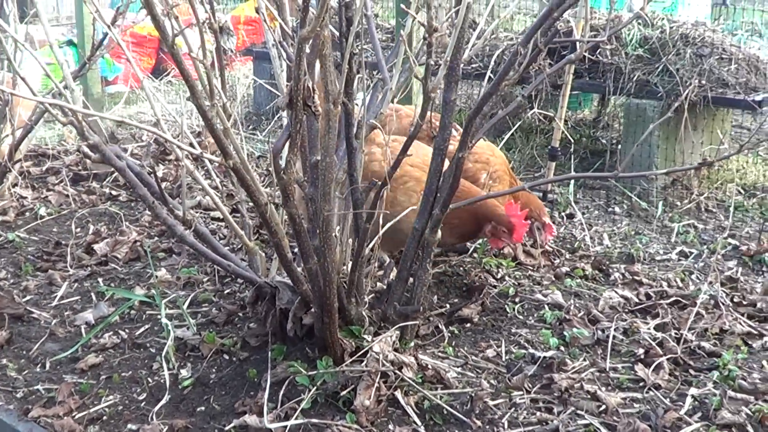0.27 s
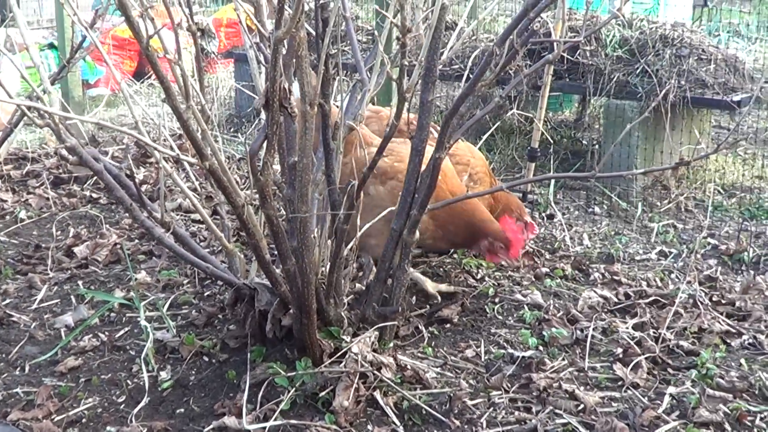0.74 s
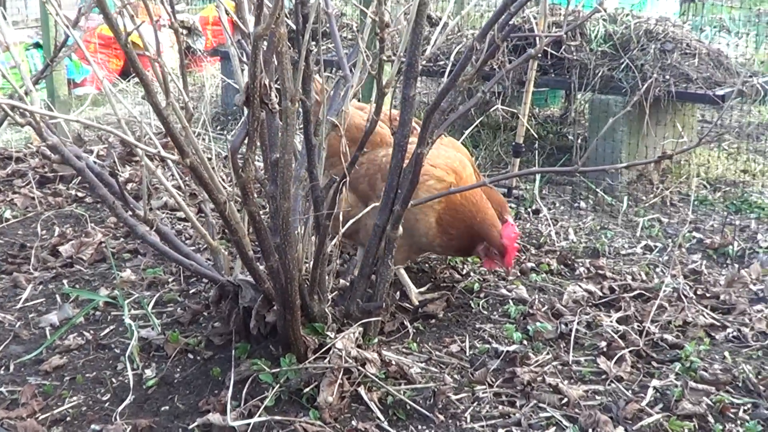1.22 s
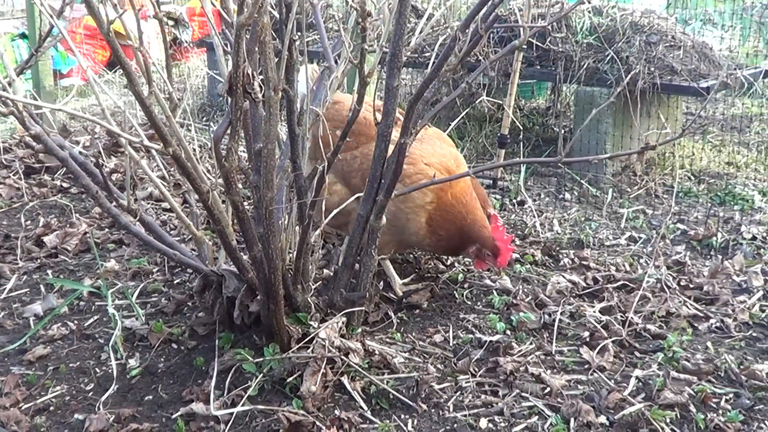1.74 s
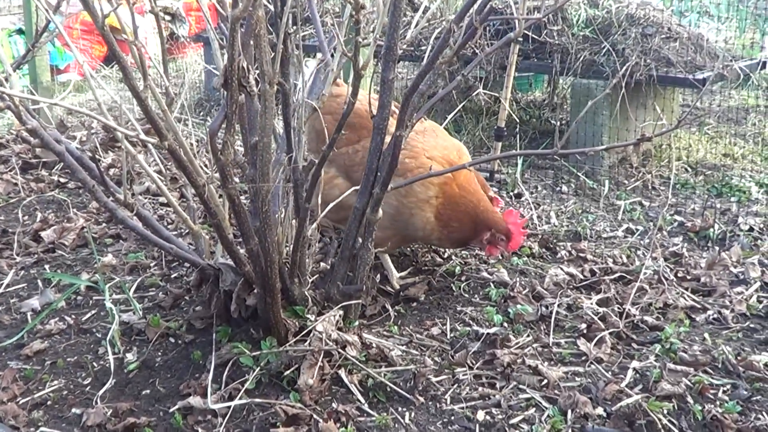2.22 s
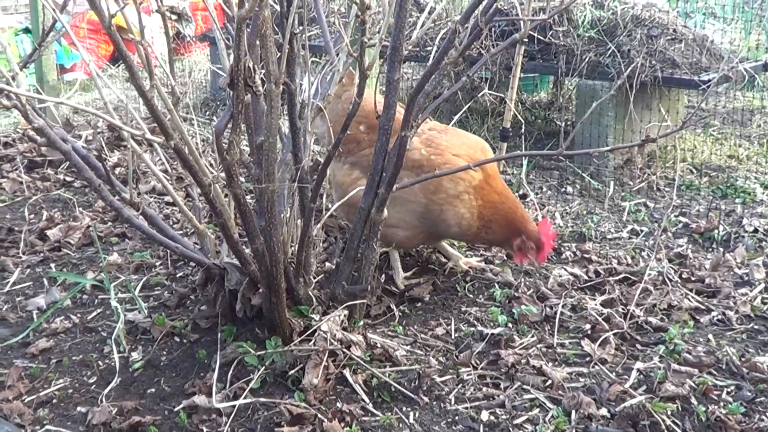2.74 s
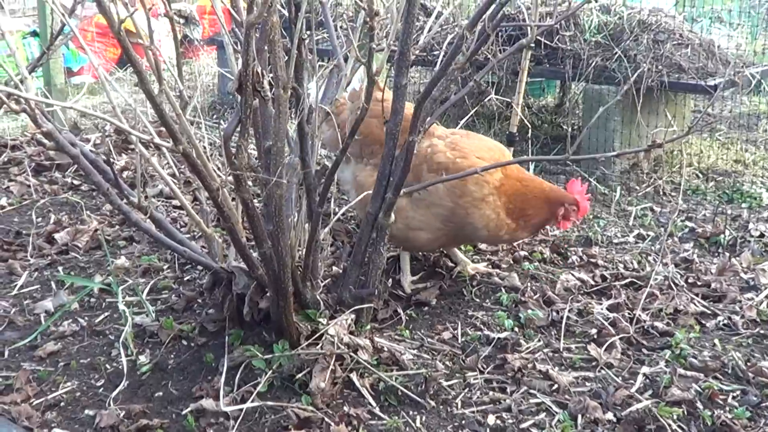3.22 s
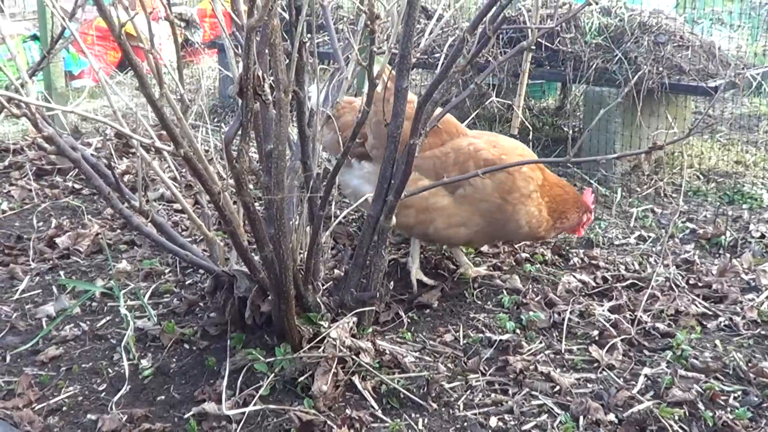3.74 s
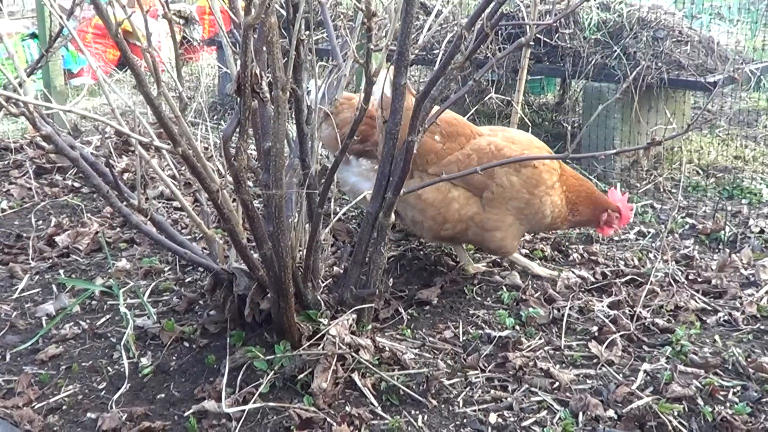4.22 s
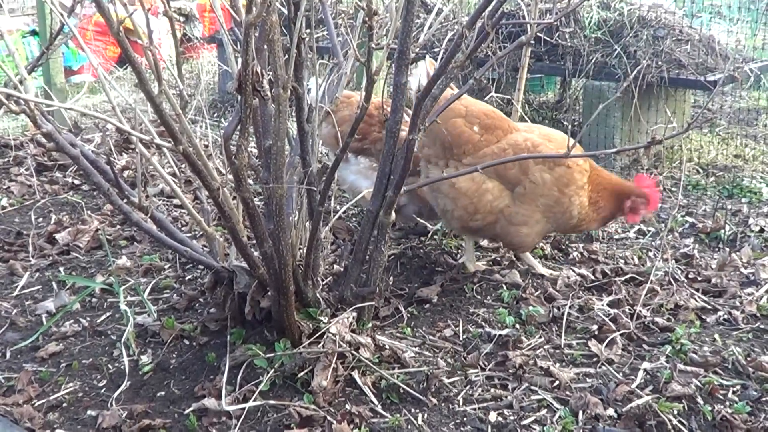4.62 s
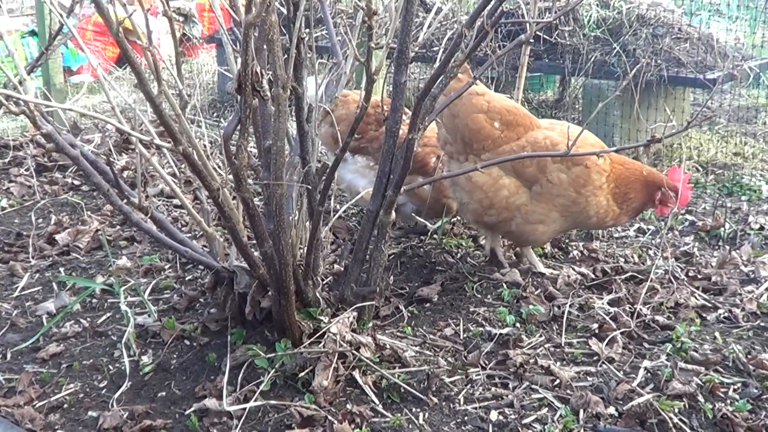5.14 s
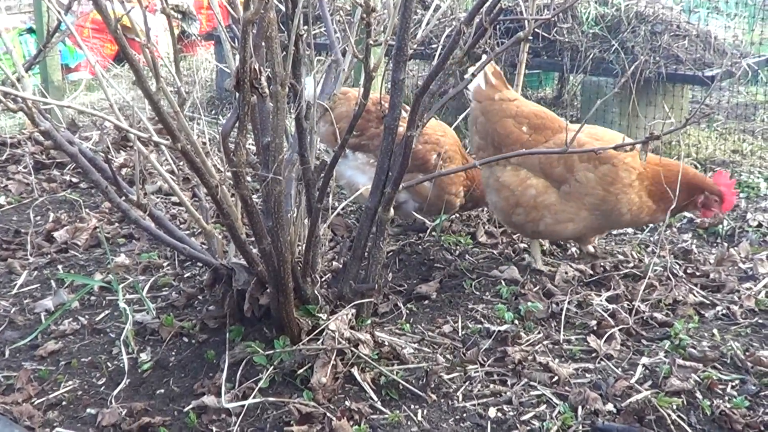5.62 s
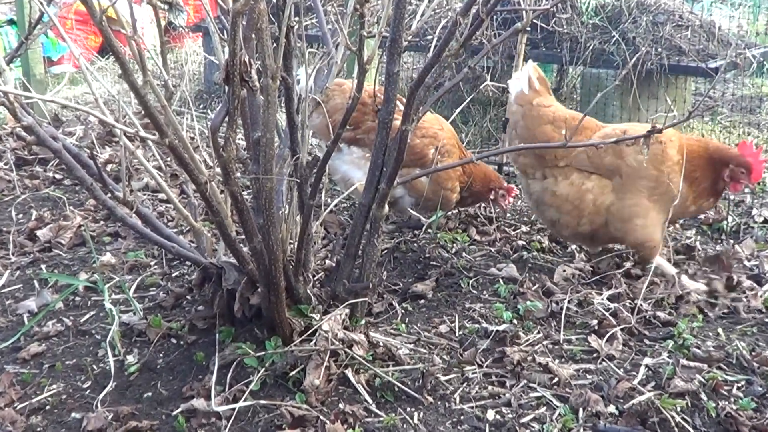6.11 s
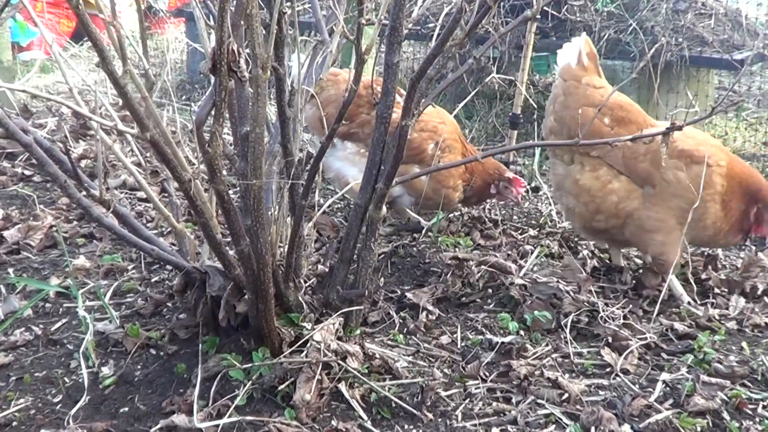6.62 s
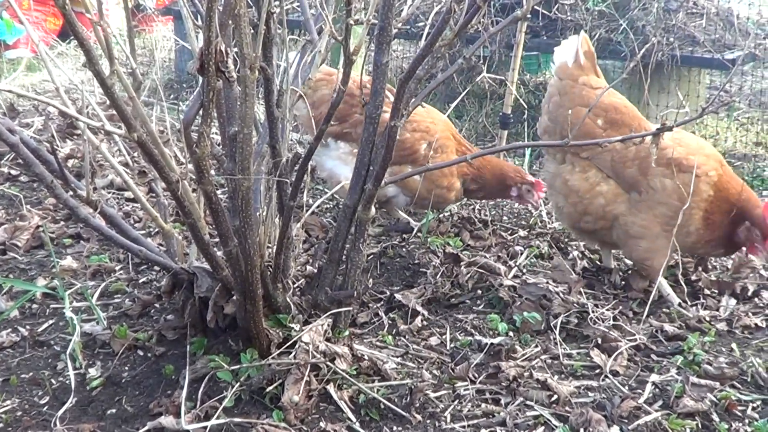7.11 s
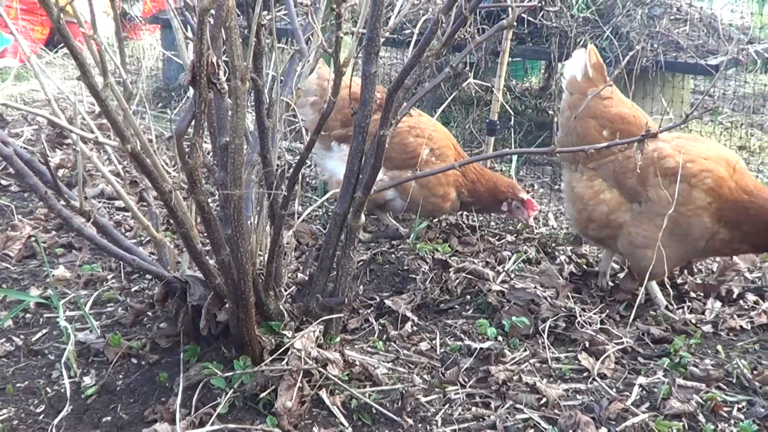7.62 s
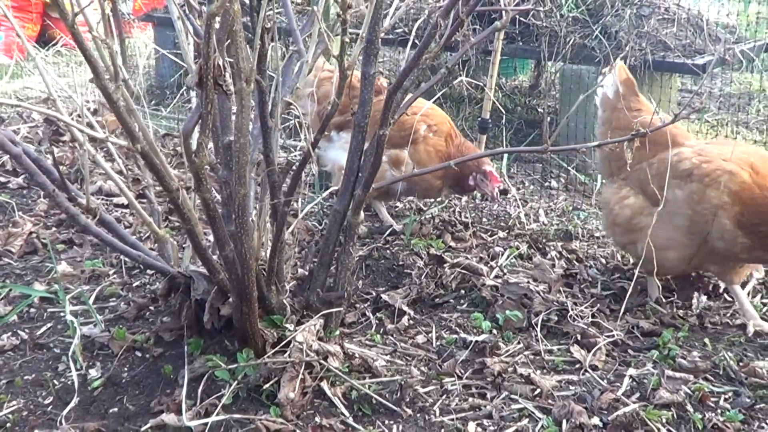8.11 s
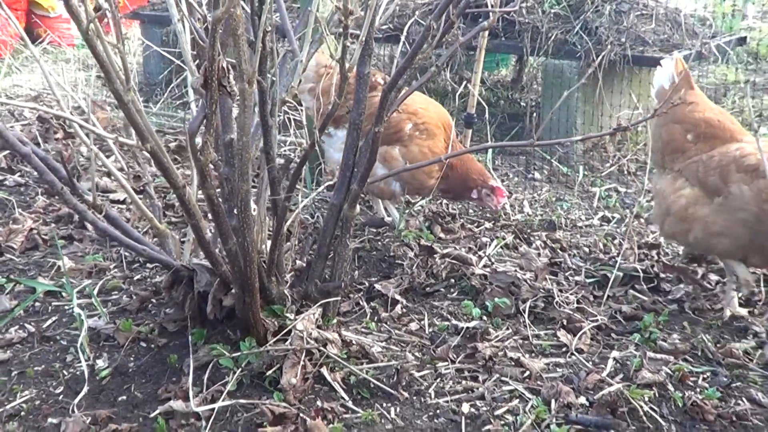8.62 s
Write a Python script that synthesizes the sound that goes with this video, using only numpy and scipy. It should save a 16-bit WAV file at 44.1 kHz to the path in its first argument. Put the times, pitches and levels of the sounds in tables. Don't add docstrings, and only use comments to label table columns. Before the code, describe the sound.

Outdoors in a garden, hens forage in dry leaves a few metres from a small stereo camera microphone. Light crackles and scattered leaf snaps come first, with a distant finch wheezing and twittering and a near bird chirping. Around six seconds the scratching becomes vigorous and loud, then drops away. Finally rustling returns beneath a lively whistled song. Soft traffic hum, hiss and a thin high whine continue throughout.

```python
import sys
import numpy as np
from scipy import signal
from scipy.fft import rfft, irfft, next_fast_len
from scipy.io import wavfile
from scipy.ndimage import uniform_filter1d

SR = 44100
rng = np.random.default_rng(int(sys.argv[2]) if len(sys.argv) > 2 else 0)


def amplitude_ratio(level_db):
    exponent = np.asarray(level_db, float) / 20
    return 10 ** exponent


def master_out(mix):
    frames = np.transpose(np.atleast_2d(mix))
    ceiling = np.clip(frames, -1, 1)
    pcm = np.round(ceiling * 32767).astype(np.int16)
    wavfile.write(sys.argv[1], SR, pcm)


N = 390718
T = np.arange(N) / SR
LEFT_RIGHT = np.array([[1], [-1]])


def level(x, db):
    return x * amplitude_ratio(db) / np.sqrt(np.mean(x ** 2))


def colour(x, *tables):
    size = next_fast_len(N)
    octave = np.log(np.arange(size // 2 + 1) * SR / size + 1)
    db = 0
    for table in tables:
        hz, table_db = np.array(table).T
        db = db + np.interp(octave, np.log(hz), table_db)
    return irfft(rfft(x, size) * amplitude_ratio(db), size)[..., :N]


def band(x, lo_hz, hi_hz, order=2):
    sos = signal.butter(order, [lo_hz, min(hi_hz, .45 * SR)], "band", fs=SR, output="sos")
    return signal.sosfilt(sos, x)


def walk(rate):
    hold = int(SR / rate)
    steps = np.repeat(rng.standard_normal(N // hold + 1), hold)
    return 1.3 * uniform_filter1d(uniform_filter1d(steps, hold), hold)[:N]


def pan(x, db):
    return x * amplitude_ratio(LEFT_RIGHT * db / 2)


def add(out, s, x):
    i = int(s * SR)
    out[..., i:i + x.shape[-1]] += x[..., :N - i]


def swells(rows, still_db):
    t = T[::64]
    power = amplitude_ratio(2 * still_db)
    for s, db, rise, fall in rows:
        slope = np.where(t < s, (s - t) / rise, (t - s) / fall)
        power = power + amplitude_ratio(2 * (db - 20 * slope))
    return np.interp(T, t, 10 * np.log10(power))


def garden(x, t60, wet_db, patchy_db):
    t = np.arange(SR) / SR
    walls = np.repeat(amplitude_ratio(patchy_db * rng.standard_normal(SR // 300 + 1)), 300)[:SR]
    fade = amplitude_ratio(-60 * t / t60) * np.clip(t / 0.0067, 0, 1)
    tail = rng.standard_normal((2, SR)) * walls * fade
    tail = tail / np.sqrt(np.sum(tail ** 2) / 2)
    return amplitude_ratio(wet_db) * signal.fftconvolve(x[None], tail, axes=1)[:, :N]


def town():
    # (pitch [Hz], level [dB])
    hum_colour = [(15, -48), (25, -21), (147, -6.5), (273, -6.5), (304, -8), (456, -5), (739, -2.5),
                  (2610, -18.5), (2910, -17), (3910, -17), (14200, -23), (15400, -23.5)]
    mid, side = colour(rng.standard_normal((2, N)), hum_colour)
    hum = level(mid + 0.96 * side * LEFT_RIGHT, -50.8)
    return pan(hum * amplitude_ratio(0.2 * walk(1.15)), -1.1)


def whine():
    tone_hz, tone_db, skirt_db = 15625, -60.5, -70.5
    skirt = level(band(rng.standard_normal(N), tone_hz - 120, tone_hz + 120), skirt_db)
    return amplitude_ratio(tone_db) * np.sin(2 * np.pi * tone_hz * T) + skirt * amplitude_ratio(4.0 * walk(50))


def leaves():
    # (time [s], peak level [dB], time to climb 20 dB [s], time to sink 20 dB [s])
    scrapes = [(0.0, -52.5, .1, 0.5), (.55, -48.5, .26, 0.27), (2.3, -59, 0, .5), (2.75, -56.5, 0.2, .4),
               (3.3, -63.5, .2, .3), (3.975, -51, 0.26, 0.17), (4.35, -51, .1, 0.14), (4.8, -49, .05, 0.1),
               (5.284, -58.5, 0.2, .1), (5.492, -46, 0.03, 0.55), (5.76, -57, 0.5, .15),
               (5.925, -37, .06, .08), (6.14, -34, 0.06, 0.33), (6.272, -31.5, 0.3455, 0.315),
               (6.38, -34.5, 0.4, 0.21), (6.575, -36.5, 0.595, 0.16), (6.74, -53, .12, .22),
               (7.71, -51, .1, .4), (7.84, -49, .1, .6), (7.99, -45.5, 0.32, .3),
               (8.169, -44.5, 0.45, 0.12), (8.46, -51.5, 0.5, .2), (8.592, -41, 0.33, .08),
               (8.725, -45, 0.2, .12), (8.85, -49, .2, .2)]
    # (time [s], peak level [dB])
    pecks = [(.605, -46.5), (.772, -45.5), (.862, -56), (.912, -52), (1.03, -48), (1.062, -47.5),
             (1.365, -51.5), (1.626, -52), (1.695, -51), (1.888, -43.5), (2.035, -47.5), (2.07, -53),
             (2.262, -51), (2.441, -45), (2.646, -43.5), (3.03, -58), (3.52, -51), (3.64, -57),
             (4.32, -46.5), (4.772, -49), (5.466, -51), (5.545, -47.5), (5.97, -38), (7.835, -43),
             (7.925, -43.5), (8.085, -40.5), (8.33, -49.5), (8.39, -52), (8.5, -43), (8.665, -47),
             (8.785, -40.5)]
    # (pitch [Hz], level [dB])
    leaf_colour = [(350, -46), (600, -11), (661, -8.5), (869, -11.5), (2310, -9.5), (4980, -3), (8860, -1),
                   (13400, -8), (16000, -16)]
    peck_rise_s, peck_fall_s, still_db = 0.031, 0.049, -71.5
    db = swells(scrapes + [(s, d, peck_rise_s, peck_fall_s) for s, d in pecks], still_db)
    rate = 900 * amplitude_ratio(.5 * (db + 46.5)) + 700
    mid, side = 0, 0
    for lo_hz, hi_hz, depth in ((4500, 15900, 0.01), (496, 4500, 0.0), (3960, 9800, 0.0), (8000, 22000, 0.018)):
        size_db = np.minimum(3.5 * rng.exponential(size=N), 10)
        cracks = (rng.random(N) < rate / SR) * amplitude_ratio(size_db) / np.sqrt(rate)
        fading = signal.lfilter([1], [1, -np.exp(-1 / (.0006 * SR))], cracks)
        burst = fading * rng.standard_normal(N)
        grains = band(burst, lo_hz, hi_hz) * amplitude_ratio(depth * (db + 23) + 1.8 * walk(30))
        mid = mid + grains
        side = side + grains * walk(450)
    both = colour(mid + 0.21 * side * LEFT_RIGHT, leaf_colour)
    return amplitude_ratio(db + 0.93) * pan(both, 0.26) / np.std(both)


def wheezes(table, tilt_db, pulse_db):
    swing_rate_hz = 78
    out, flutter, waver = np.zeros(N), walk(59.55), walk(400)
    for s, length, lo_hz, hi_hz, sink_hz, db in table:
        u = np.linspace(0, 1, int(length * SR))
        rate = swing_rate_hz * (1 + .025 * flutter[:len(u)])
        swing = .5 - .5 * np.cos(2 * np.pi * np.cumsum(rate) / SR)
        width_hz = (hi_hz - lo_hz) * (1 - .6 * u ** 4 - .25 * (1 - u) ** 3)
        floor_hz = lo_hz + 60 * flutter[-len(u):] + 70 * waver[:len(u)] - sink_hz * u ** 4
        pitch = floor_hz + swing * width_hz
        loudness = amplitude_ratio(tilt_db * swing - pulse_db * swing * (1 - swing))
        buzz = np.sin(2 * np.pi * np.cumsum(pitch) / SR) * loudness
        ends = np.clip(u / 0.058 + 0.31, 0, 1) * np.clip((1 - u) / 0.15, 0, 1)
        add(out, s, level(buzz, db) * ends)
    return out


def far_wheeze():
    # (time [s], length [s], lower pitch [Hz], upper pitch [Hz], sink [Hz], level [dB])
    blurred_calls = [
        (0.0, .655, 3560, 4900, 404, -52.5),
    ]
    return wheezes(blurred_calls, 0.5, 3)


def whistles(paths, rough_db, waver_hz, hoarse=()):
    throat_hz, throat_width_hz, rise_db = 6500, 2500, -44
    out, waver = np.zeros(N), waver_hz * walk(300)
    for path in paths:
        s, hz, db = np.array(path).T
        t = np.arange(s[0], s[-1], 1 / SR)
        smooth_hz = uniform_filter1d(np.interp(t, s, hz), size=90)
        pitch = smooth_hz + np.resize(waver[int(s[0] * SR):], len(t))
        phase = 2 * np.pi * np.cumsum(pitch) / SR
        tone = np.sin(phase) + amplitude_ratio(-40) * np.sin(2 * phase)
        tone = tone * amplitude_ratio(np.interp(t, s, db) + 3)
        if hoarse and hz[2] > 1.5 * hz[0]:
            rasp = 1 + .6 * rng.standard_normal(len(t) // 12 + 1).repeat(12)[:len(t)]
            u = (t - s[0] + .011) / (s[2] - s[0])
            for k, d, share in hoarse:
                throat_db = -12 * ((k * pitch - throat_hz) / throat_width_hz) ** 2 / k
                loudness = amplitude_ratio(rise_db + .45 * (db[2] + 34) + d + throat_db)
                hump = np.sin(np.pi * np.clip(u / share, 0, 1)) ** 2
                tone += loudness * np.sin(k * phase) * hump * rasp
        edge = np.clip(np.minimum(t - s[0], s[-1] - t) / .0015, 0, 1)
        add(out, s[0], edge * tone)
    return out * amplitude_ratio(rough_db * walk(250))


def glides(table, lift_db):
    midway = .64
    return [[(s, a_hz, db), (s + length / 2, a_hz + midway * (b_hz - a_hz), db + lift_db), (s + length, b_hz, db)]
            for s, length, a_hz, b_hz, db in table]


def sing(syllable, times):
    return [[(s + tempo * at, factor * hz, db + d) for at, hz, d in syllable] for s, factor, tempo, db in times]


def far_twitter():
    # (time [s], length [s], start pitch [Hz], end
    # pitch [Hz], level [dB])
    twitter = [(.062, 0.045, 7750, 6450, -55), (.105, .025, 6450, 6400, -53), (.158, .022, 4950, 5700, -52),
               (.176, .055, 5750, 5950, -49), (.285, .06, 3550, 4600, -48), (.345, .045, 4550, 4700, -51),
               (.775, .03, 5900, 5900, -51), (.835, .04, 5330, 5280, -46), (.73, 0.077, 5590, 5680, -48.5),
               (.803, 0.035, 5850, 5300, -47), (.895, .02, 4100, 4540, -51), (.92, .022, 4300, 5100, -50),
               (.945, .045, 4300, 3800, -55), (.99, .055, 3800, 3680, -56), (.905, .02, 5300, 3700, -57),
               (1.415, 0.087, 3975, 4100, -59), (2.6, .035, 3625, 4500, -66), (2.84, .029, 4300, 4680, -64),
               (3.08, .012, 3600, 4350, -61), (3.85, .015, 4500, 5150, -58), (5.08, .09, 4660, 4600, -62),
               (5.228, .075, 4880, 5700, -51.5), (5.345, .021, 7300, 6750, -56),
               (5.385, .02, 7500, 6250, -54), (5.44, .042, 5200, 4800, -54),
               (5.592, 0.026, 5340, 4800, -50), (5.71, .06, 6080, 6000, -53), (5.77, .075, 6000, 5650, -54),
               (5.95, .085, 4610, 4700, -47.5), (6.9, .015, 3600, 3800, -62), (7.0, .013, 4200, 5000, -63),
               (7.52, .013, 5650, 6260, -59)]
    # (time into the call [s], pitch [Hz], level [dB])
    tsip = [(0, 4230, -3), (.01, 3880, 0), (.021, 3300, -3)]
    # (time [s], level [dB])
    tsip_times = [(1.56, -59), (1.65, -58.7), (1.73, -58), (1.905, -63), (3.255, -64), (3.325, -63.5),
                  (3.41, -62), (3.45, -62), (3.7, -63)]
    calls = sing(tsip, [(s, 1, 1, db + 1.5) for s, db in tsip_times])
    return whistles(glides(twitter, -.5) + calls, 3.5, 90)


def hits(table, t60, wide):
    out, t = np.zeros((2, N)), np.arange(1400) / SR
    patter = amplitude_ratio(-20) * amplitude_ratio(-60 * t / .04)
    shape = np.clip(t / .0004, 0, 1) * (amplitude_ratio(-60 * t / t60) + patter)
    for s, db, hz, *pan_db in table:
        noise = rng.standard_normal(len(t))
        ring = band(noise * shape, hz / wide, hz * wide)
        ring = amplitude_ratio(db - 0.15) * ring / abs(ring).max()
        add(out, s - .0006, pan(ring, sum(pan_db)))
    return out


def snaps():
    # (time [s], peak level [dB], ring pitch [Hz])
    cracking_leaves = [(0.5328, -32, 11000), (0.628, -30, 7000), (0.7975, -31, 8620), (0.8741, -30, 10300),
                       (1.6198, -30, 10600), (1.6928, -34, 7600), (1.8898, -25, 9900),
                       (2.4514, -21.5, 9000), (2.6587, -27, 9400), (3.6152, -35, 11300),
                       (3.9303, -33, 9700), (3.9665, -33, 7600), (4.3234, -25, 10700), (5.3777, -19, 6900),
                       (5.4864, -25, 7800), (5.5452, -28, 8100), (5.9672, -20, 7900), (5.9737, -12.5, 8050),
                       (6.1056, -24, 10400), (6.3018, -7, 8000), (6.5954, -19, 9000), (6.6871, -31, 10100),
                       (7.4582, -26, 6150), (7.4822, -26.5, 6000), (7.7801, -30, 7830), (7.7958, -29, 7100),
                       (7.8233, -27, 8200), (8.1104, -23, 8900), (8.1817, -27.5, 7700), (8.431, -25, 9000)]
    # (time [s], peak
    # level [dB])
    ticks = [(.0109, -33.5), (.2751, -39), (.5953, -31.5), (.7383, -37), (.8544, -34), (.902, -34),
             (.9138, -30.5), (1.0628, -35), (1.6279, -35), (2.5495, -37.5), (2.7518, -35), (2.7617, -37),
             (2.9746, -33.5), (3.625, -34.5), (3.8886, -35.5), (4.2481, -37), (4.7694, -35), (5.5279, -27),
             (5.669, -34), (5.9378, -29), (6.0203, -26.5), (6.6286, -25), (6.6351, -26), (6.8478, -35),
             (6.9072, -37), (7.5609, -38.5), (8.0084, -33), (8.5927, -25), (8.6907, -32), (8.7213, -29),
             (5.4541, -41), (5.4646, -37), (5.508, -34), (5.5913, -32), (5.6307, -36), (5.9041, -29),
               (5.918, -28), (5.9565, -29), (6.0732, -26), (6.0986, -25), (6.1296, -20), (6.1366, -18),
               (6.155, -17), (6.161, -18), (6.1824, -19), (6.2209, -17), (6.2548, -17), (6.2707, -11),
               (6.3077, -18), (6.3261, -17), (6.3441, -18), (6.3625, -17), (6.379, -18), (6.4763, -22),
               (6.5002, -23), (6.5282, -24), (6.5456, -23), (6.5761, -23), (6.58, -22), (6.6175, -26),
               (6.6928, -36), (6.7546, -35), (6.7601, -39), (6.7821, -36), (7.9459, -31), (7.9674, -31),
               (7.9883, -28), (8.0402, -31), (8.0617, -30), (8.0796, -25), (8.0911, -26), (8.1171, -30),
               (8.145, -31), (8.1684, -29), (8.3425, -37), (8.352, -40), (8.3904, -36), (8.4368, -34),
               (8.573, -30), (8.6069, -33), (8.6748, -35), (8.6788, -32), (8.7242, -32), (8.7307, -33),
               (8.7396, -35), (8.7446, -35)]
    # (time [s], peak level [dB], ring pitch [Hz], left minus right [dB])
    knocks = [(0.5317, -36.5, 2750, -5), (1.8694, -47, 2190, -4), (2.658, -44, 1530, -1),
              (2.9741, -39, 2540, -4), (3.585, -42.5, 4500, 0), (3.738, -43.5, 2700, 2),
              (3.839, -45, 1760, -1.0), (4.2453, -42.5, 2820, -1.0), (5.377, -31.5, 2750, 0),
              (5.973, -35, 2060, -4), (6.5944, -32.5, 2010, 0), (6.7166, -35, 2290, -2.5),
              (7.4574, -36, 2230, -3.5), (7.4822, -32.5, 2240, -6), (7.7428, -37, 2250, 2),
              (7.7793, -28, 2950, -8), (8.0077, -38, 2280, -4), (8.1449, -38, 2410, -7),
              (8.1927, -26.5, 2240, 3)]
    tick_hz = 8900
    small = [(s, d, tick_hz) for s, d in ticks]
    return hits(cracking_leaves + small, 0.0091, 1.54) + hits(knocks, .02, 1.4)


def wind():
    # (time [s], peak level [dB])
    puffs = [(1.52, -62), (1.862, -58), (2.043, -55.5), (3.955, -53), (5.29, -52.5), (5.47, -52),
             (5.68, -51.5), (6.026, -52.5), (6.25, -57), (6.515, -47.5), (6.65, -53), (7.256, -62)]
    rise_s, fall_s, calm_db = .15, 0.24, -67
    mid, side = band(rng.standard_normal((2, N)), 53, 172) * amplitude_ratio(2.1 * walk(22))
    strength = amplitude_ratio(swells([(s, d, rise_s, fall_s) for s, d in puffs], calm_db))
    return strength * level(mid + .7 * side * LEFT_RIGHT, -1.7)


def near_chirps():
    # (time [s], pitch [Hz], level [dB])
    chirp_paths = [
        [(2.029, 1800, -64), (2.054, 3500, -49), (2.067, 4320, -33), (2.082, 4526, -36), (2.114, 4314, -38),
         (2.119, 4310, -50)],
        [(2.256, 1800, -67), (2.283, 3350, -51), (2.299, 4240, -36), (2.307, 4290, -31), (2.338, 4215, -30),
         (2.35, 4215, -44)],
        [(5.843, 2300, -63), (5.857, 3200, -55), (5.871, 4300, -46), (5.881, 4464, -42), (5.896, 4328, -36),
         (5.926, 4259, -31), (5.934, 4250, -44)],
        [(6.048, 2400, -62), (6.064, 3300, -52), (6.079, 4250, -37), (6.09, 4345, -32), (6.12, 4300, -32),
         (6.128, 4290, -44)],
        [(6.384, 4330, -44), (6.392, 4325, -34), (6.42, 4220, -34), (6.44, 4160, -44)],
        [(6.703, 4450, -58), (6.722, 4400, -46), (6.74, 4380, -54), (6.752, 4330, -62), (6.765, 4420, -55),
         (6.8, 4440, -62)],
    ]
    # (multiple of the pitch [ratio], level [dB], share of the rise [ratio])
    rasp_tones = [(1.5, 1.5, 1), (2.02, 7, 1.4), (2.5, 2, 0.85), (3.02, -1, .75)]
    return whistles(chirp_paths, 1.1, 26, rasp_tones)


def far_car():
    # (time [s], peak level [dB], time to climb 20 dB [s], time to sink 20 dB [s])
    car_pass = [
        (5.2, -60.5, 6.5, 9),
    ]
    mid, side = band(rng.standard_normal((2, N)), 420, 800)
    return amplitude_ratio(swells(car_pass, -90)) * level(mid + 0.83 * side * LEFT_RIGHT, 0)


def late_wheezes():
    # (time [s], length [s], lower pitch [Hz], upper pitch [Hz], sink [Hz], level [dB])
    clear_calls = [
        (7.044, .385, 3480, 4820, 200, -57.5),
        (7.608, .044, 4300, 5100, 100, -50),
    ]
    return wheezes(clear_calls, -3, 11)


def near_song():
    # (time into the syllable [s], pitch [Hz], level [dB])
    drop = [(0, 4300, -8), (.004, 4380, 0), (.01, 3780, 0), (.014, 3500, 1), (.021, 3560, -6)]
    arch = [(0, 3200, -7), (.006, 3650, -2), (.015, 3900, 0), (.034, 3930, -4), (.046, 3750, -1),
            (.053, 3350, -1), (.059, 2800, 3), (.066, 2300, -9)]
    tumble = [(0, 3600, -9), (.005, 4300, -4), (.014, 4620, -5), (.017, 3900, -7), (.021, 3600, 2),
              (.028, 3570, 1), (.035, 2950, 2), (.041, 3660, -1), (.05, 3660, -9)]
    hook = [(0, 2500, -8), (.004, 2700, -2), (.011, 2860, 0), (.016, 3060, -1), (.021, 2750, -1),
            (.025, 2400, -5), (.03, 1950, -14)]
    # (time [s], pitch factor [ratio], tempo factor [ratio], level [dB])
    drop_times = [
        (7.561, 1.3, .7, -51),
        (7.728, .99, 1., -41.5),
        (7.795, 1.05, 1.1, -45),
        (7.856, 1.01, 1, -42.5),
        (7.921, 1.01, 1.05, -41.5),
        (8.82, 1, 1.2, -48),
    ]
    arch_times = [
        (8.048, 1.01, .92, -41),
        (8.226, 1., 1., -38.5),
    ]
    tumble_times = [
        (8.338, 1.03, 1.03, -40),
        (8.474, .99, 0.98, -38),
        (8.605, .99, 1.03, -37),
    ]
    hook_times = [
        (8.399, 1.03, .98, -39),
        (8.531, .99, 1.05, -38),
        (8.67, .97, .95, -37),
    ]
    # (time [s], length [s], start pitch [Hz], end pitch [Hz], level [dB])
    flourishes = [(7.557, .012, 3500, 2800, -57), (7.582, .007, 4200, 2900, -49),
                  (8.002, .008, 5800, 4800, -46), (8.01, .008, 4800, 3300, -44),
                  (8.018, .005, 3400, 4700, -51), (8.023, .012, 4700, 4200, -52),
                  (8.174, .016, 5700, 4000, -47), (7.588, 0.017, 2870, 4400, -47),
                  (7.605, 0.044, 4430, 4240, -56), (8.765, .006, 4700, 6300, -40),
                  (8.771, .0067, 4600, 6500, -34), (8.778, .0053, 5475, 6100, -37),
                  (8.79, .0047, 6680, 5400, -33), (8.797, .0094, 5970, 5050, -33.5),
                  (8.843, .0096, 3400, 5100, -45), (8.85, 0.01, 2700, 5000, -38)]
    verse = sing(drop, drop_times) + sing(arch, arch_times)
    verse += sing(tumble, tumble_times) + sing(hook, hook_times)
    return whistles(verse + glides(flourishes, 2.5), 2.4, 50)


def birds():
    blur, far = far_wheeze(), far_twitter()
    chirps, buzz, song = near_chirps(), late_wheezes(), near_song()
    echoes = garden(chirps, .52, -7.5, 1.5) * amplitude_ratio(3.5 * walk(70))
    echoes = echoes + garden(song, .4, -3.5, 3.)
    echoes = echoes + garden(far + .8 * buzz + 1.3 * blur, .45, -.5, 3.)
    distant = 0.75 * far + 0.9 * buzz + .45 * blur
    return pan(chirps, -3.0) + pan(.9 * song, -1.6) + pan(distant, -1.3) + echoes


def scene():
    litter = leaves() + snaps()
    litter_echo = garden(litter.mean(axis=0), 0.22, -15, 1.4)
    return litter + litter_echo + birds() + town() + wind() + whine() + far_car()


def band_limit(x):
    return signal.sosfilt(signal.butter(12, 16500, fs=SR, output="sos"), x)


def record(dry):
    # (pitch [Hz], level [dB])
    port_width = [(60, -14), (200, -9.5), (700, -6.5), (1500, -1), (4000, -0.5), (8000, -1.5),
                  (15000, -19.5)]
    side = colour((dry[0] - dry[1]) / 2, port_width)
    narrowed = dry.mean(axis=0) + side * LEFT_RIGHT
    top_cut = signal.ellip(12, .2, 70, 15900, fs=SR, output="sos")
    return band_limit(signal.sosfilt(top_cut, narrowed))


dry = scene()
out = record(dry)
master_out(out)
```